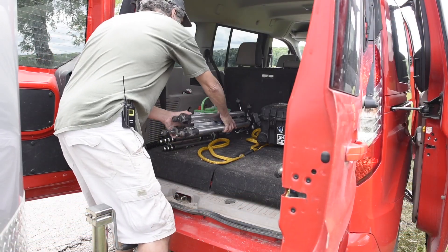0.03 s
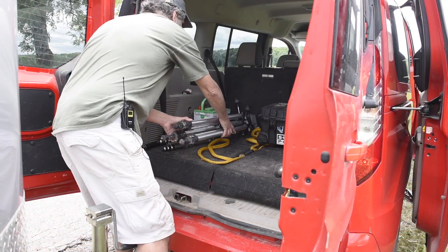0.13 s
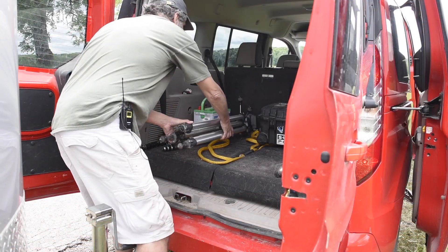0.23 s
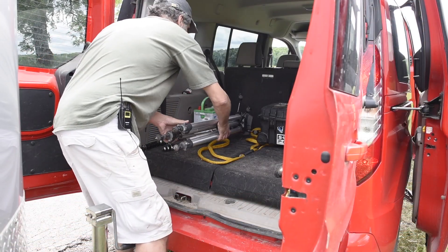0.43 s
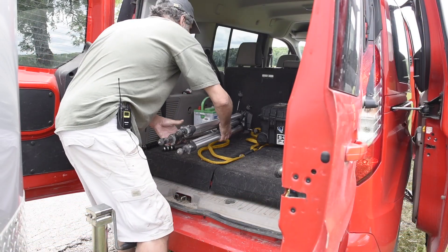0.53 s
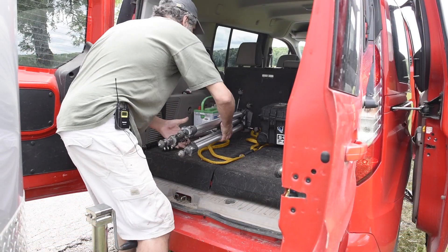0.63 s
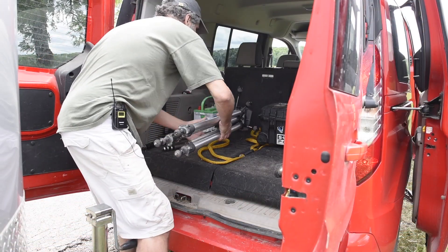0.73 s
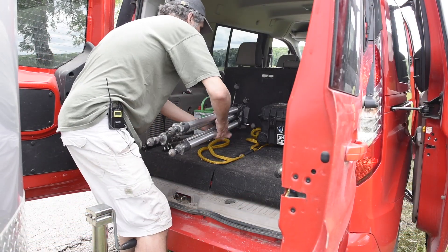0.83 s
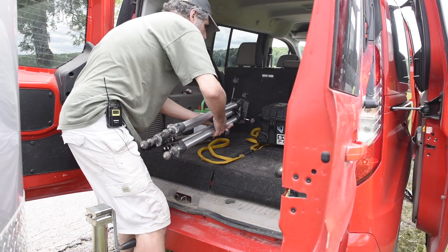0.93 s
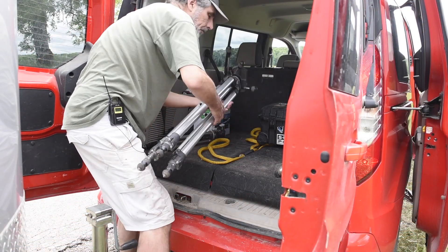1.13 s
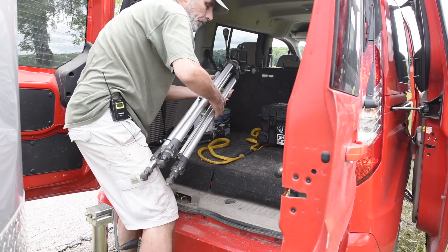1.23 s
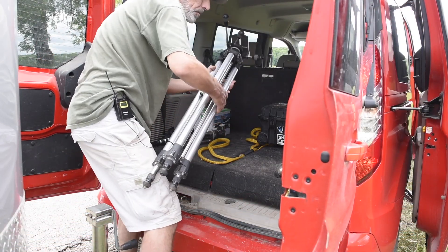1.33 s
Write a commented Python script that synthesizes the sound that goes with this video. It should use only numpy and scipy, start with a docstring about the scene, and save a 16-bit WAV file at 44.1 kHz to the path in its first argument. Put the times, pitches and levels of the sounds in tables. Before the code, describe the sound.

A metal tripod knocks and clinks over a hollow carpeted van floor, then goes quiet

```python
"""At the open cargo space of a van, close to one mono microphone, with nearly still air outside.
From the start a folded metal tripod drags over the floor: filtered noise rumbles, tiny random slips scrape.
The interior adds short noise-like reflections to the metal and the scrape throughout. Damped low modes bump
the hollow floor, one blow far louder than the rest; legs and clamps clack as coloured noise bursts.
Tubes ring as decaying sines, and between them jolts of the drag sound low hollow tones."""
import sys
import numpy as np
from scipy import signal
from scipy.io import wavfile
from scipy.ndimage import uniform_filter1d

SR = 44100
rng = np.random.default_rng(int(sys.argv[2]) if len(sys.argv) > 2 else 0)


def transcribe(signal):
    """Save signal, clipped to [-1, 1], as a 16-bit WAV file at the path in sys.argv[1]."""
    frames = np.atleast_2d(signal).T
    limited = np.clip(frames, -1, 1)
    pcm = np.round(limited * 32767).astype(np.int16)
    wavfile.write(sys.argv[1], SR, pcm)


N = 61739  # length [samples]


def amp(db):
    """Decibels to gain."""
    return 10 ** (np.asarray(db) / 20)


def unit(x):
    """Scales to rms 1."""
    return x / np.sqrt(np.mean(x ** 2) + 1e-20)


def read(points, hz):
    """Reads a table on a log-frequency axis."""
    f, value = np.transpose(points)
    return np.interp(np.log(hz + 1), np.log(f + 1), value)


def level(points):
    """Gain over time, in straight lines of dB between the points."""
    return amp(np.interp(np.arange(N) / SR, *np.transpose(points)))


def add(mix, s, sound):
    """Mixes a sound in at a time in seconds, cut off at the end of the mix."""
    part = mix[max(round(s * SR), 0):][:len(sound)]
    part += sound[:len(part)]


def colour(x, db_at, size=4096):
    """Causal minimum-phase filter with the gain curve db_at(hz)."""
    hz = abs(np.fft.fftfreq(size, 1 / SR))
    log_gain = np.log(amp(db_at(hz)))
    # the Hilbert transform of the log gain supplies the minimum phase
    spectrum = np.exp(np.conj(signal.hilbert(log_gain)))
    taps = np.fft.ifft(spectrum).real[:size // 2]
    return signal.fftconvolve(x, taps)[:len(x)]


def shaped(x, points):
    """Gives a sound a spectrum, at rms 1."""
    return unit(colour(x, lambda hz: read(points, hz)))


def fade(t, t60):
    """Exponential decay by 60 dB in t60 seconds."""
    return np.exp(-np.log(1000) * t / max(t60, 1e-3))


# still air outside the van: (frequency [Hz], relative gain [dB])
AIR_COLOUR = [(70, -0.5), (200, -7.5), (450, -4), (1000, -12), (2000, -16.5), (6500, -17.5), (15500, -34.5)]
AIR_DB = -72  # rms before the microphone's low cut


def outdoor_air():
    """Steady noise with a falling spectrum, the quiet background outdoors."""
    return amp(AIR_DB) * shaped(rng.standard_normal(N), AIR_COLOUR)


# the load rocking on the floor: (time [s], level [dB])
RUMBLE_LEVEL = [(0, -59), (.19, -62), (.215, -33), (.28, -44), (.36, -47.5), (.40, -65.5), (.48, -63),
                (.53, -58), (.7, -55), (.8, -69.5), (1.0, -66.5), (1.08, -79)]
# spectrum of that rocking: (frequency [Hz], relative gain [dB])
RUMBLE_COLOUR = [(20, -41.5), (45, 0.5), (62, 0.5), (98, -1), (130, -8.5), (190, -2), (290, -13),
                 (600, -35.5), (2000, -67)]


def floor_rumble():
    """The shifting load drives the cargo floor as low noise of changing level."""
    return level(RUMBLE_LEVEL) * shaped(rng.standard_normal(N), RUMBLE_COLOUR)


# feet and cloth scraping along the floor: (time [s], level [dB])
SCRAPE_LEVEL = [(0, -49.5), (.03, -57.5), (.15, -56.5), (.18, -53.5), (.28, -45), (.35, -57), (.47, -64),
                (.49, -49.5), (.57, -54), (.6, -55.5), (.73, -52), (.79, -68), (.935, -70.5), (.955, -61),
                (1.0, -50.5), (1.05, -74.5), (1.17, -82.5), (1.4, -65.5)]
# spectrum of the scraping: (frequency [Hz], relative gain [dB])
SCRAPE_COLOUR = [(70, -34.5), (190, -1), (300, -1), (550, 7.5), (900, -2.5), (1600, 0.5), (3000, -8.5),
                 (4500, -8.5), (6000, -16), (8500, -19), (15500, -30)]
GRAINS_PER_S, GRAIN_SPREAD_DB = 4400, 3  # mean rate of slips, scale of their uneven strength


def scrape():
    """Dense tiny slips of random sign and strength as the tripod slides."""
    hits = rng.random(N) < GRAINS_PER_S / SR
    signs = rng.choice([-1, 1], N)
    strength = amp(GRAIN_SPREAD_DB * np.minimum(rng.exponential(1, N), 4))
    return level(SCRAPE_LEVEL) * shaped(hits * signs * strength, SCRAPE_COLOUR)


# decay of the van's interior: (frequency [Hz], t60 [s])
VAN_T60 = [(100, 0.039), (500, 0.22), (2000, 0.19), (6000, 0.053), (15000, 0.33)]
VAN_DB, VAN_DELAY_S = -15.5, 0.004  # level of the reflections, wait before they begin


def van(x):
    """Short, dense reflections of the cargo space: a noise tail that decays at its own rate in each band."""
    hz, t, bands = signal.stft(rng.standard_normal(SR // 3), SR, nperseg=256)
    t60 = np.maximum(read(VAN_T60, hz), 0.01)[:, None]
    tail = signal.istft(bands * np.exp(-np.log(1000) * t / t60), SR)[1]
    out = np.zeros(N)
    add(out, VAN_DELAY_S, signal.fftconvolve(x, tail / np.linalg.norm(tail)))
    return amp(VAN_DB) * out


# bumps on the cargo floor: (time [s], level [dB], factor on the mode frequencies)
BUMPS = [(0.031, -41, 1.02), (.163, -29, 1.2), (0.2123, -9.5, 0.97), (0.256, -32, 0.93),
         (.306, -36.5, 0.97), (0.338, -32.5, 0.38), (0.907, -46.5, 0.58)]
# modes of the hollow floor at factor 1: (frequency [Hz], relative level [dB], t60 [s])
FLOOR_MODES = [(202, 5.5, 0.044), (245, -2, 0.029), (398.5, -6, 0.053), (610, -14, 0.02)]
BUMP_RISE_S = 0.0033


def floor_bumps():
    """Soft blows on the carpeted hollow floor: low damped modes with a slow rise."""
    t, out = np.arange(SR // 4) / SR, np.zeros(N)
    rise = 1 - np.exp(-t / BUMP_RISE_S)
    for s, db, pitch in BUMPS:
        boom = sum(amp(mode_db) * fade(t, t60) * np.sin(2 * np.pi * hz * pitch * t)
                   for hz, mode_db, t60 in FLOOR_MODES)
        add(out, s, -amp(db) * boom * rise)
    return out


# spectrum of a plain knock: (frequency [Hz], gain [dB])
KNOCK_COLOUR = [(30, 10), (90, 29.5), (200, 38), (330, 36.5), (600, 40), (1400, 31.5), (2100, 28.5),
                (4500, 31), (5800, 23), (8200, 22), (11000, 17), (15500, 13)]
# damped resonances of the clamps and head: (frequency [Hz], width [Hz], boost [dB])
CLAMPS = [(1624, 250, 4), (2655, 1000, 4), (4430, 700, 2), (7930, 550, 2.5)]
BODY_HZ, CLACK_HZ, CLICK_HZ, TREBLE_HZ = 248, 1310, 3900, 8500  # where each blow's colours act
CONTACT_S, CHATTER_DB = 0.00024, 1.5  # rise of a blow, rms unevenness of its rattle
SNAP = 0.25  # height of the click, with the rattle's first 8 ms at energy 1
RIPPLE_DB = 2.5  # random unevenness of each knock's spectrum above 2 kHz


def knock(db, body_db, clack_db, treble_db, roll_hz, t60):
    """A hard click and a fast decaying rattle of the joints, coloured by the clamps."""
    t = np.arange(SR // 6) / SR
    chatter = amp(CHATTER_DB * unit(uniform_filter1d(rng.standard_normal(len(t)), size=60)))
    rise = 1 - np.exp(-t / CONTACT_S)
    drive = rng.standard_normal(len(t)) * chatter * fade(t, t60) * rise
    drive /= np.linalg.norm(drive[:SR // 125])
    drive[SR // 1000] += SNAP  # 1 ms after the onset
    tint = [(BODY_HZ, body_db), (CLACK_HZ, clack_db), (CLICK_HZ, 0), (TREBLE_HZ, treble_db)]
    spots = np.geomspace(2000, 16000, 48)
    # the first spot stays at 0 dB, so the spectrum below it has no ripple
    ripple_db = RIPPLE_DB * rng.standard_normal(len(spots)) * (spots > spots[0])
    ripple = np.transpose([spots, ripple_db])

    def db_at(hz):
        clamps = sum(boost / (1 + (2 * (hz - f) / w) ** 2) for f, w, boost in CLAMPS)
        roll_off = 10 * np.log10(1 + (hz / roll_hz) ** 6)
        return read(KNOCK_COLOUR, hz) + read(tint, hz) + read(ripple, hz) + clamps - roll_off
    return amp(db) * colour(drive, db_at)


# legs and clamps knocking: (time [s], level before the colours [dB], low body [dB], mid clack [dB],
# treble [dB], roll-off [Hz], t60 [s]); body, clack and treble are relative to the level
KNOCKS = [(0.064, -52.5, -35, -17, 1.5, 14800, 0.082), (0.1596, -39.5, -11, 7.5, -5, 12600, 0.063),
          (0.2124, -35.5, 5, 9.5, -1.5, 15500, 0.033), (.2185, -31.5, 1.5, 3.5, -3.5, 14900, 0.07),
          (0.2432, -28.5, -27.5, -2, -4.5, 14500, 0.051), (0.266, -51.5, 0, 5, 14, 14000, 0.042),
          (0.2908, -43.5, -41, 3, -6, 7400, 0.026), (0.4839, -65.5, 20, 11, -2, 8000, 0.086),
          (.509, -43, -14, -16, 9.5, 11900, 0.034), (0.5195, -29, -11, -1, 2.5, 10000, 0.033),
          (0.541, -42.5, 4, -1, 4.5, 13000, 0.034), (0.5896, -42.5, -7, 5, -13, 9000, 0.09),
          (.605, -44.5, -11, 7, 0, 14300, 0.1), (0.611, -51, 15.5, -14, 17, 13000, 0.019),
          (0.6229, -40.5, -14, -11, 0, 11000, 0.023), (.633, -38.5, -24, 2.5, -3.5, 12000, 0.051),
          (0.6637, -34.5, -25, 2, -2, 11100, 0.03), (0.673, -49, -1.5, 8.5, 3, 7000, 0.06),
          (0.7105, -50, -2, 6.5, 4, 7950, 0.034), (0.7271, -43.5, -47, -5, -1.5, 6360, 0.06),
          (0.7535, -45.5, -36, -5, 9, 6500, 0.073), (0.807, -48.5, -28, -2, 12.5, 13500, 0.071),
          (0.8445, -58.5, -20, -2, 7, 11000, 0.03), (.871, -69, -14, -7, 16.5, 15200, 0.32),
          (.891, -58.5, -34, -8.5, 11.5, 14000, 0.06), (0.9427, -47, 3, -2, 2.5, 16000, 0.14),
          (.972, -43, -11, -13, -1, 7840, 0.032), (.9805, -42, -13, 2, 1.5, 8900, 0.04),
          (0.9989, -58.5, -9.5, 5, 10, 9800, 0.079), (1.0635, -64.5, -3, -12.5, 7.5, 8070, 0.069),
          (1.261, -66, -5.5, -0.5, -3, 8830, 0.02)]


def knocks():
    """Metal legs and clamps strike one another, each blow with its own colour and decay."""
    out = np.zeros(N)
    for s, *blow in KNOCKS:
        add(out, s, knock(*blow))
    return out


CLINK_SPLIT, CLINK_TWIN_DB = 12, -9.5  # partner detuning [cycles per t60], level of each partner


def clink(hz, db, t60, twin_db=CLINK_TWIN_DB, count=4):
    """One resonance decays while beating with a few detuned partner tones."""
    t = np.arange(SR // 2) / SR
    spread_hz = min(CLINK_SPLIT / max(t60, 1e-3), hz / 10)
    twins = sum(np.sin(2 * np.pi * (hz + spread_hz * detune) * t + np.pi * phase)
                for detune, phase in rng.uniform(-1.08, 1, (count, 2)))
    tones = np.sin(2 * np.pi * hz * t) + amp(twin_db) * twins
    tones /= np.sqrt(1 + count * amp(twin_db) ** 2)
    return amp(db) * fade(t, t60) * (1 - np.exp(-t / CONTACT_S)) * tones


def ring(modes, twin_db=CLINK_TWIN_DB):
    """A struck part rings in all its modes at once; partner tones make it shimmer."""
    return sum(clink(*mode, twin_db=twin_db) for mode in modes)


# blows that set the tubes ringing: (time [s], level of the leg tubes [dB], level of the centre column [dB])
RINGS = [(0.159, -51, -82), (.2125, -54, -60), (0.2437, -51.5, -70), (0.2909, -50, -75),
         (0.5197, -64, -36.5), (0.6626, -53, -41.5), (0.8072, -67, -43), (.8456, -82, -51),
         (.876, -74, -59)]
# modes of the leg tubes: (frequency [Hz], relative level [dB], t60 [s])
LEG_MODES = [(1845, -6.5, 0.54), (2205, -4.5, 0.31), (2417, 0, 0.3), (3365, -2, 0.24), (4156, -7, 0.33),
             (4217, -8, 0.31)]
# modes of the centre column: (frequency [Hz], relative level [dB], t60 [s])
COLUMN_MODES = [(480, -8.5, 0.35), (3965, 0.5, 0.061), (4700, -5.5, 0.12), (5560, -1, 0.063),
                (6550, -10, 0.16), (7450, -13, 0.11), (8500, -11.5, 0.1)]
LEG_TWIN_DB = -3.5  # the leg sections are nearly alike, so their partner tones are strong


def tube_rings():
    """Blows ring the modes of the leg tubes and the centre column in varying proportion."""
    out = np.zeros(N)
    legs, column = ring(LEG_MODES, twin_db=LEG_TWIN_DB), ring(COLUMN_MODES)
    for s, leg_db, column_db in RINGS:
        add(out, s, amp(leg_db) * legs + amp(column_db) * column)
    return out


# single resonances within or beside the knocks: (time [s], frequency [Hz], level [dB], t60 [s])
CLINKS = [(0.1596, 3050, -29, 0.018), (0.1609, 1545, -29.5, 0.056), (0.2122, 948, -24, 0.043),
          (0.2121, 1473, -19.5, 0.015), (0.2115, 2580, -29, 0.03), (.2435, 3480, -22.5, 0.027),
          (0.2455, 4170, -21, 0.025), (.2435, 4610, -25, 0.019), (0.245, 7260, -34.5, 0.036),
          (.2933, 7100, -52, 0.054), (.314, 7110, -55.5, 0.24), (0.5092, 5800, -36.5, 0.029),
          (0.5191, 2780, -21, 0.021), (.5197, 630, -33, 0.13), (.5197, 832, -30, 0.03),
          (.54, 7870, -34, 0.033), (0.539, 5050, -38.5, .05), (.588, 626, -44, 0.23),
          (0.634, 4560, -34.5, 0.039), (.709, 1410, -35.5, 0.093), (0.7596, 5500, -35.5, 0.025),
          (.98, 1305, -41.5, 0.067), (.9995, 683, -33.5, 0.025), (1.259, 2250, -55, 0.032)]


def clinks():
    """Single decaying resonances heard within or beside the knocks."""
    out = np.zeros(N)
    for s, *resonance in CLINKS:
        add(out, s, clink(*resonance))
    return out


# jolts of the dragged tripod that sound its hollow tones: (time [s], level [dB])
JOLTS = [(.596, -44), (0.6662, -41.5), (.712, -52)]
# hollow tones: (frequency [Hz], relative level [dB], t60 [s])
HOLLOW_MODES = [(189, -5.5, 0.13), (273, 0, 0.19), (437, -7, 0.16)]


def hollow_jolts():
    """Jolts of the drag excite the tripod's low hollow modes."""
    out, hollow = np.zeros(N), ring(HOLLOW_MODES)
    for s, db in JOLTS:
        add(out, s, amp(db) * hollow)
    return out


def scene():
    """The tripod with its reflections in the van, the floor beneath it and quiet outdoor air."""
    air = outdoor_air()
    floor = floor_rumble() + floor_bumps()
    gear = scrape() + knocks() + tube_rings() + clinks() + hollow_jolts()
    return (gear + van(gear) + floor + air)[None]  # one channel


LOW_CUT_HZ, EDGE_HZ = 68, 15900  # microphone's low cut, recorder's upper limit


def record(dry):
    """The microphone's low cut thins the bass and the recorder's band limit removes the top."""
    low_cut = signal.butter(2, LOW_CUT_HZ, "highpass", fs=SR, output="sos")
    thin = signal.sosfilt(low_cut, dry)
    band_limit = signal.firwin(511, EDGE_HZ, window=("kaiser", 9), fs=SR)
    return signal.oaconvolve(thin, band_limit[None], "same")


dry = scene()
out = record(dry)
transcribe(out)
```